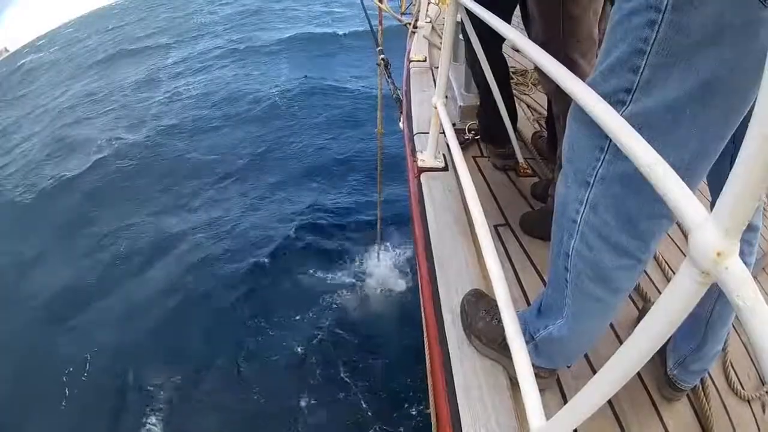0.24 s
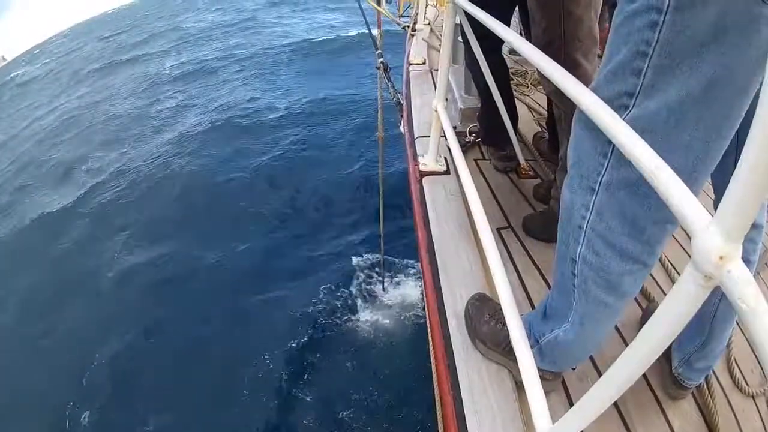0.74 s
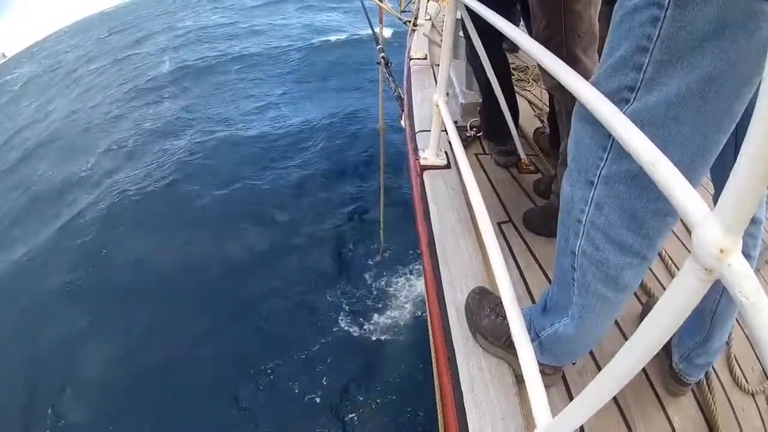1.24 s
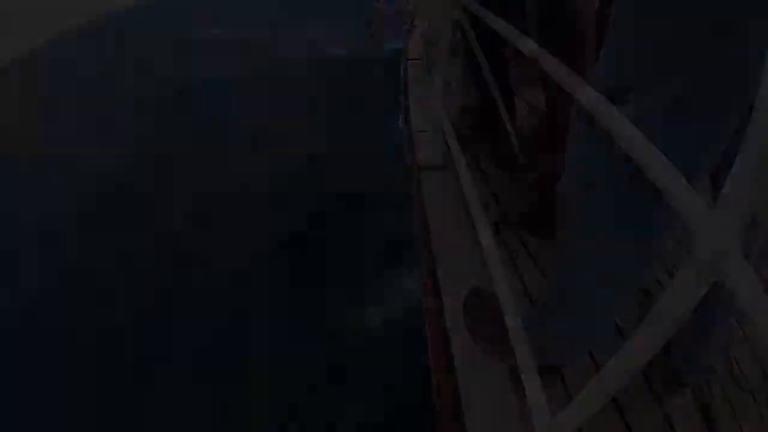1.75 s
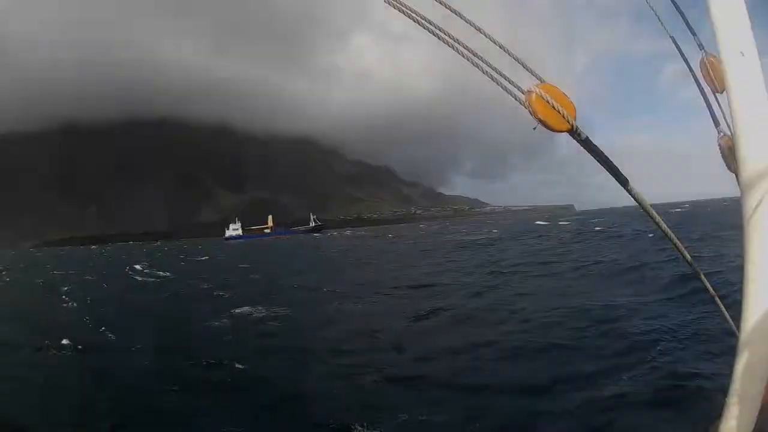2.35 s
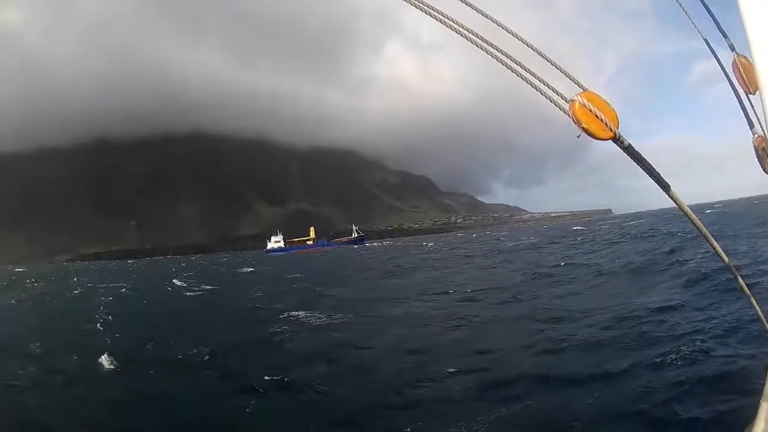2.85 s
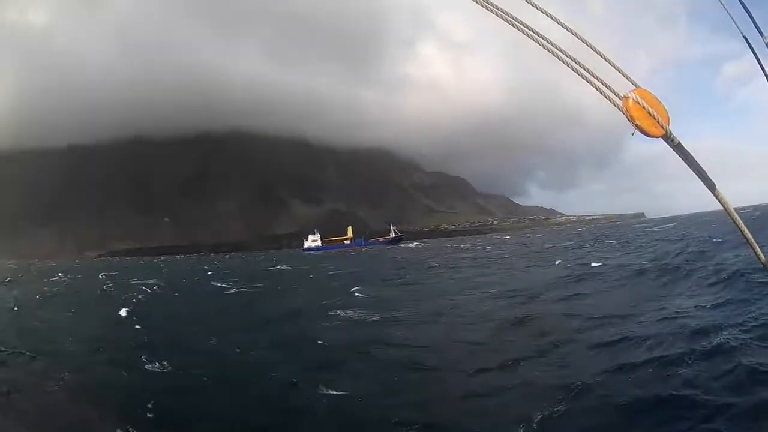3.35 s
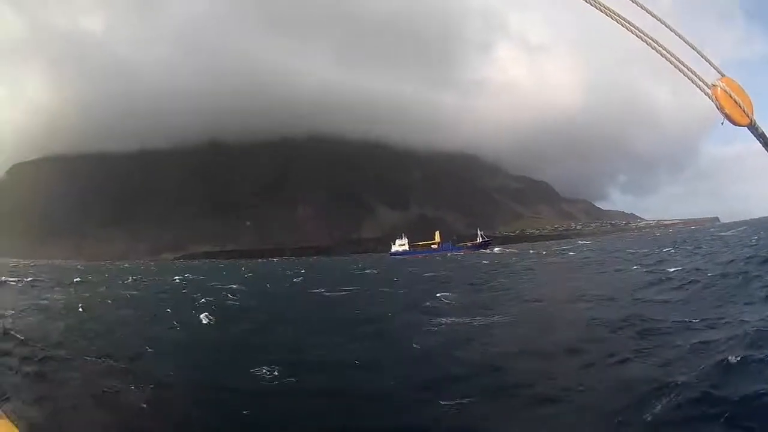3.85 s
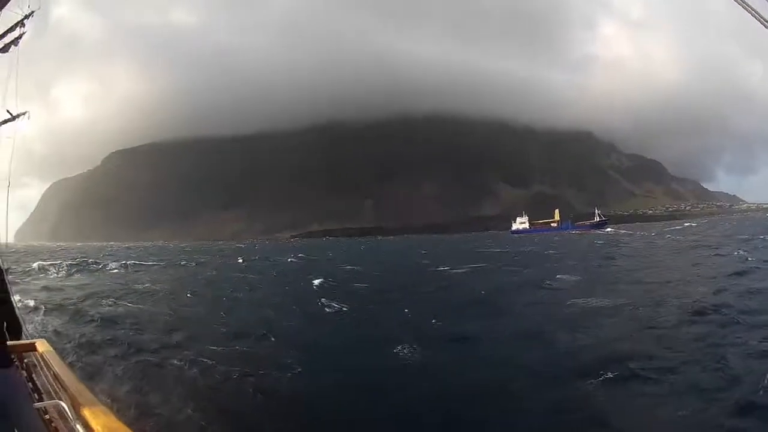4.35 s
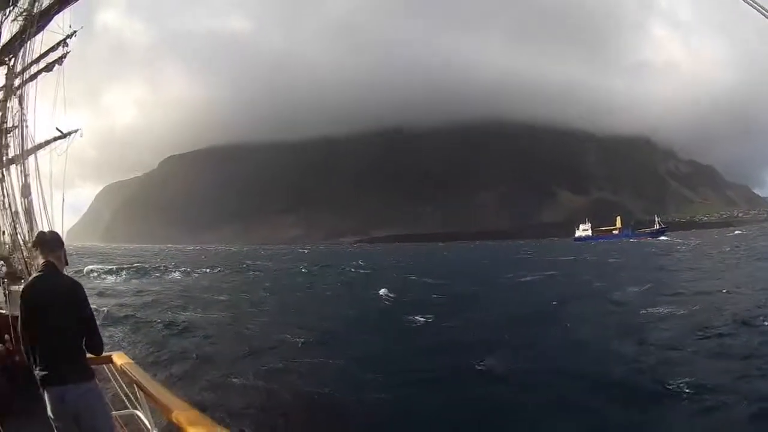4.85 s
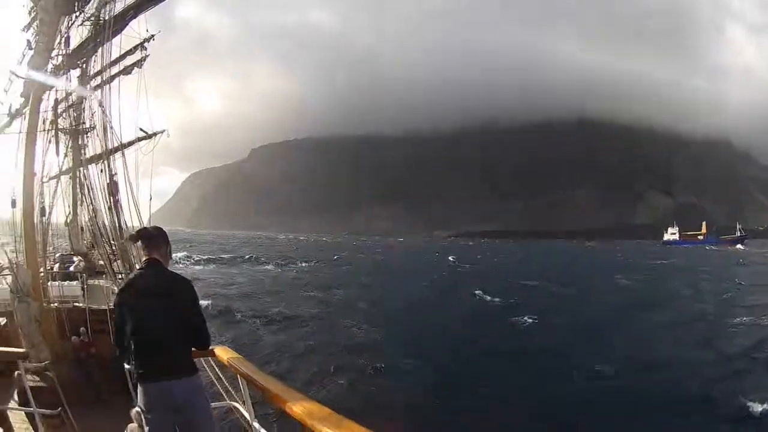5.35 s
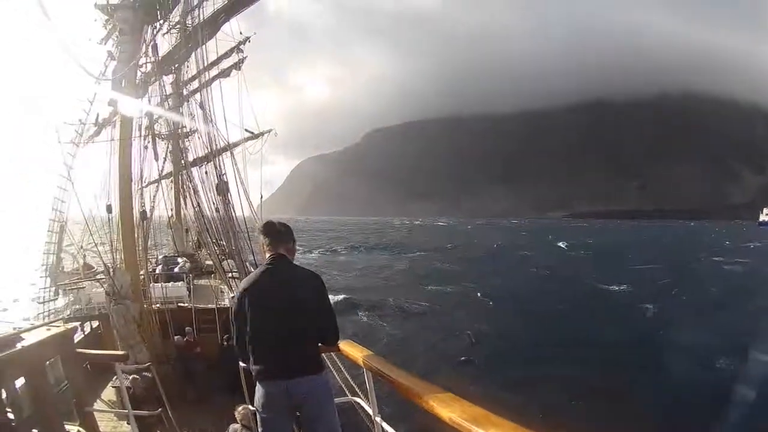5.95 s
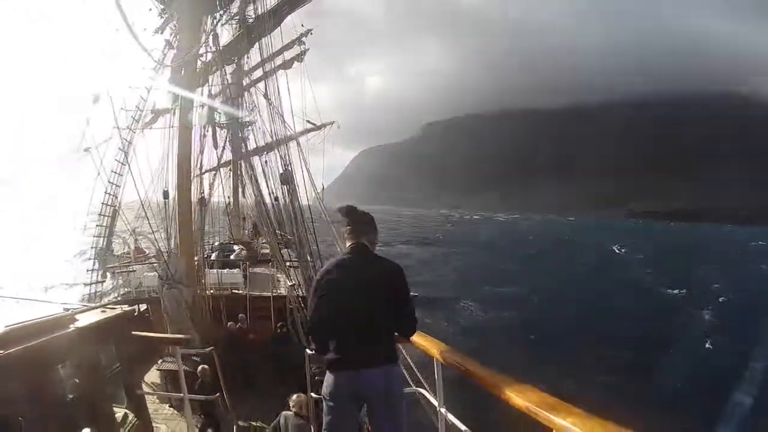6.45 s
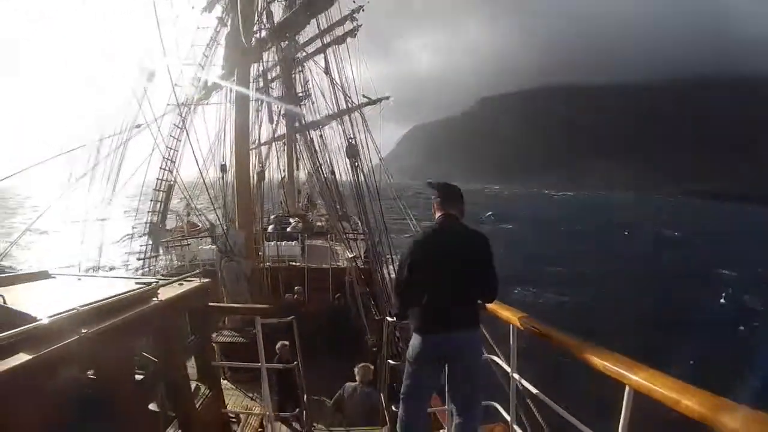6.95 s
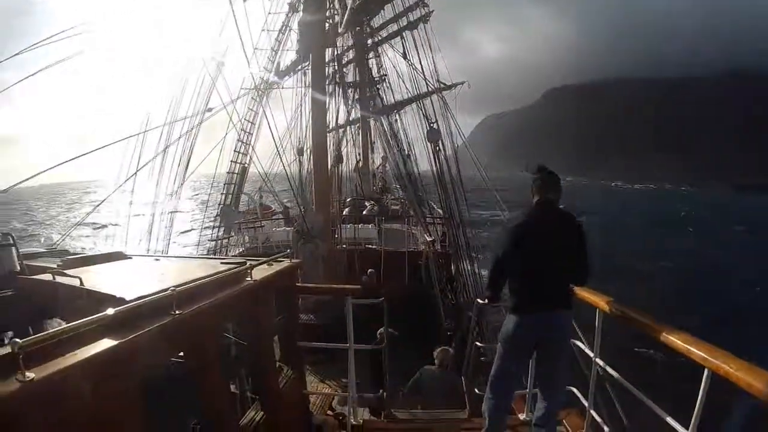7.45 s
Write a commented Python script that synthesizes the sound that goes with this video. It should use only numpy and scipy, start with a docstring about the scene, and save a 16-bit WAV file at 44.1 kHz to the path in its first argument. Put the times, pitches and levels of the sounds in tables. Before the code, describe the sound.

On a sailing ship at sea, dull water wash and brief squeaks fade into rough buffeting wind, with thumps, rushing bursts and a thin whine.

```python
"""Wind on the microphone port of a small camera in a closed housing, on a ship's deck.
The sound opens in the lee: sea wash, a faint machinery hum, a double tick and squeaks. It cross-fades to the
open deck, where gusts give a lumpy rumble (low coloured noise and single thumps), flutter and bursts of rushing
air (gated noise in the bands of the housing), with spray. Noise makes wash, spray and amplifier hiss; sines make
hum, squeaks and a thin electronic whine; damped sines ring the struck housing."""
import sys
import numpy as np
from scipy import signal
from scipy.fft import rfft, irfft, next_fast_len
from scipy.io import wavfile
from scipy.ndimage import uniform_filter1d, map_coordinates

SR = 44100
rng = np.random.default_rng(int(sys.argv[2]) if len(sys.argv) > 2 else 0)


def level_to_linear(level):
    """Convert decibel levels to linear amplitude factors, elementwise."""
    exponent = np.asarray(level, float) / 20
    return 10 ** exponent


def to_wav(sig):
    """Store sig (one row per channel, or 1-D mono) as 16-bit WAV at the path in sys.argv[1].

    Samples outside -1..1 are clipped; the rate is SR.
    """
    pcm = np.clip(np.atleast_2d(sig), -1, 1) * 32767
    pcm = np.round(pcm).astype(np.int16)
    wavfile.write(sys.argv[1], SR, pcm.T)  # frames by channels


N = 339393  # samples

REFERENCE_FLOW_DB, REFERENCE_PRESSURE_DB = -58, -38  # the reference wind


def unit(x):
    """Normalisation of the mean power: scale to rms 1."""
    return x / np.sqrt(np.mean(x ** 2) + 1e-20)


def curves(rows):
    """Linear interpolation in time: one value per sample for each column after the time."""
    s, *cols = np.transpose(rows)
    return [np.interp(np.arange(N) / SR, s, c) for c in cols]


def wobble(rate):
    """Band-limited random modulation: a smooth random curve with rate knots a second."""
    knots = rng.standard_normal(int(N * rate / SR) + 4)
    return map_coordinates(knots, [np.arange(N) * rate / SR])


def coloured(x, spectrum):
    """Linear filtering in the frequency domain: (Hz, dB) points joined on a log axis."""
    m = next_fast_len(N + 8192)
    f, db = np.transpose(spectrum)
    hz = np.fft.rfftfreq(m, 1 / SR)
    gain = level_to_linear(np.interp(np.log(hz + 1), np.log(f), db))
    return irfft(rfft(x, m) * gain, m)[:N]


def noise(spectrum, patchy_db):
    """Non-stationary coloured noise of rms 1: patches of random gain in time and frequency."""
    z = signal.stft(rng.standard_normal(N), nperseg=512)[2]
    field = uniform_filter1d(rng.standard_normal(z.shape), size=8, axis=0)
    field = uniform_filter1d(field, size=5, axis=1)
    patchy = signal.istft(z * level_to_linear(patchy_db * unit(field)), nperseg=512)[1][:N]
    return unit(coloured(patchy, spectrum))


def tones(lines, unsteady_db):
    """Line spectrum: sines of fixed frequency whose strengths waver a little."""
    t = np.arange(N) / SR
    total = np.zeros(N)
    for hz, db in lines:
        strength = np.sqrt(2) * level_to_linear(db + unsteady_db * wobble(3.24))
        total += strength * np.sin(2 * np.pi * (hz * t + rng.random()))
    return total


def swells(rows):
    """Power addition of bell-shaped envelopes (centre, level, length at half amplitude)."""
    t = np.arange(N) / SR
    power = sum(level_to_linear(db) ** 2 * np.exp(-np.log(2) * 2 * (2 * (t - s) / length) ** 2)
                for s, db, length in rows)
    return np.sqrt(power)


def share_open():
    """Linear cross-fade of exposure: 0 in the lee, 1 on the open deck."""
    # cross-fade from the lee to the open deck: start t/s, end t/s
    fade = (1.4, 2.53)
    return np.interp(np.arange(N) / SR, fade, [0, 1])


def lulls_db():
    """Momentary change of wind strength: bell-shaped dips in dB, one of them a slight rise."""
    # the wind drops out for a moment: centre t/s, depth level/dB, length at half depth t/s
    lulls = [(2.208, 4, 0.056), (2.388, 2, 0.056), (2.718, 5, 0.055), (3.1, 2.5, .04), (3.227, 3, 0.026),
             (4.268, 0, .03), (4.622, 5, 0.022), (4.97, 2.5, .04), (5.167, 2, 0.039), (6.033, 6, 0.026),
             (6.31, -1.5, 0.025), (6.708, 6, .05), (6.835, 3.5, 0.05), (6.94, 3, 0.025), (7.605, 3.5, 0.05)]
    t = np.arange(N) / SR
    return -sum(db * np.exp(-np.log(2) * (2 * (t - s) / length) ** 2) for s, db, length in lulls)


def wind_levels_db():
    """Wind as two coupled quantities, pressure and flow, that share the same lulls."""
    # the wind between its bursts, before the lulls:
    # t/s, pressure on the diaphragm level/dB, air flow through the port level/dB
    steady_wind = [(0, -43, -55), (.33, -40, -51), (.55, -42, -55), (.9, -41.5, -50.5),
                   (1.14, -41.5, -53.5), (1.74, -44.5, -55.5), (2.1, -35, -59.5), (2.45, -39.5, -65),
                   (2.75, -33.5, -63.5), (3.02, -31, -60), (3.47, -33.5, -60), (3.75, -36.5, -56.5),
                   (4.12, -38, -61), (4.45, -40.5, -63.5), (4.84, -32.5, -59), (5.3, -37, -56.5),
                   (5.68, -31, -52.5), (6.04, -33.5, -56.5), (6.47, -26.5, -52), (6.84, -31, -55.5),
                   (7.005, -33, -68), (7.035, -40.5, -68), (7.3, -50.5, -65), (7.52, -38, -62.5),
                   (7.7, -38.5, -69)]
    return curves(steady_wind) + lulls_db()


def camera():
    """Electronic self-noise: amplifier hiss and whine; unrelated hisses dip where they cross-fade."""
    # colour of the amplifier hiss: f/Hz, relative level/dB per Hz
    hiss_colour = [(2000, -0.5), (5000, 0), (9000, -3.5), (16000, -7)]
    # steady electronic tones at full exposure: f/Hz, level/dB rms
    whine = [(12952, -85), (13033, -85.5), (13113, -92.5)]
    hiss_db = -64.5  # rms
    deck = share_open()
    lee = level_to_linear(hiss_db) * noise(hiss_colour, patchy_db=-2.3)
    exposed = level_to_linear(hiss_db) * noise(hiss_colour, patchy_db=0.2) + tones(whine, unsteady_db=.5)
    return (1 - deck) * lee + deck * exposed


def machinery_hum():
    """Tonal radiation of machinery: a few lines that swell over a resting level, only in the lee."""
    # hum lines before the swell gain: f/Hz, level/dB
    hum_lines = [(271, -62), (566, -68.5), (591, -60.5)]
    # the hum swells: centre t/s, gain level/dB (added in power to the rest), length t/s
    hum_swell = [(.5, 2.5, 0.33), (1.7, 3, 0.88)]
    rest_db = -5
    gain = np.hypot(level_to_linear(rest_db), swells(hum_swell))
    return (1 - share_open()) * gain * tones(hum_lines, unsteady_db=2.1)


def sea():
    """Broadband turbulence of hull waves, dulled by the housing; wind-driven on deck, fuller in the lee."""
    # colour of the sea wash: f/Hz, relative level/dB per Hz
    wash_colour = [(450, -35), (600, -6.5), (780, -7.5), (1100, -7.5), (1400, -1.5), (1700, -9.5),
                   (2150, -17.5), (3000, -18), (3350, -20), (3900, -36.5)]
    # body of the near waves: f/Hz, relative level/dB per Hz
    gurgle = [(350, -41), (480, -6), (760, -4), (1000, -5.5), (1300, -36)]
    lee_db, deck_db = -55.5, -56.5  # on deck, at the reference wind
    follows = 0.38  # dB per dB of wind pressure on deck
    deck = share_open()
    over_db = wind_levels_db()[0] - REFERENCE_PRESSURE_DB
    level_db = (1 - deck) * lee_db + deck * (deck_db + follows * over_db)
    near = level_to_linear(-0.5) * (1 - deck) * noise(gurgle, patchy_db=3.0)
    return level_to_linear(level_db + 1.4 * wobble(11)) * (noise(wash_colour, patchy_db=2.0) + near)


def spray():
    """Superposition of many small impacts: showers of fine droplets heard as high-pitched hiss."""
    # showers of spray: centre t/s, level/dB rms at the crest, length t/s
    showers = [(5.68, -69, 0.24), (6.35, -86, .5)]
    # colour of the droplets: f/Hz, relative level/dB per Hz
    spray_colour = [(5000, -42), (7500, -2), (10000, -5), (12000, -30)]
    return swells(showers) * noise(spray_colour, patchy_db=5.0)


def squeak():
    """Linear frequency glide: thin tones whose phase is quadratic in time, so that they slide down."""
    # brief squeaks: centre t/s, level/dB rms at the crest, length t/s, f/Hz at the centre
    squeaks = [(0.483, -49, .11, 1394), (1.391, -48.5, 0.061, 1440)]
    sag = 1100  # Hz per second
    t = np.arange(N) / SR
    total = np.zeros(N)
    for s, db, length, hz in squeaks:
        cycles = (hz - sag * (t - s) / 2) * (t - s)
        total += np.sqrt(2) * swells([(s, db, length)]) * np.sin(2 * np.pi * cycles)
    return total


def ticks():
    """Impulse excitation of modes: a hard contact cracks for milliseconds and rings the housing."""
    # double tick on the housing: t/s, level/dB
    contacts = [(0.269, -29.5), (0.2803, -24.5)]
    # modes of the struck housing: f/Hz, level/dB relative to the tick, decay by 60 dB t/s
    shell = [(1440, -1, 0.0088), (2720, 3, 0.0049), (3180, -7, 0.0058), (4830, -4.5, 0.0041),
             (6000, -11, .005)]
    x, t = np.zeros(N), np.arange(SR // 50) / SR
    onset = 1 - np.exp(-t / 0.00028)
    for s, db in contacts:
        ring = sum(level_to_linear(level - 60 * t / t60) * np.sin(2 * np.pi * hz * t) for hz, level, t60 in shell)
        crack = level_to_linear(-11 - 60 * t / .004) * rng.standard_normal(len(t))
        x[round(s * SR):][:len(t)] -= level_to_linear(db) * onset * (ring + crack)
    return x


def thumps():
    """Damped swing of a diaphragm: each push sucks it out and lets it swing back once."""
    # single hard pushes of air on the diaphragm: t/s, peak level/dB, ring f/Hz
    pushes = [(2.335, -27, 80), (2.847, -23, 80), (2.927, -21, 80), (3.036, -23, 81), (3.168, -23, 80),
              (3.351, -24, 80), (3.521, -27, 80), (3.942, -23, 80), (4.232, -27.5, 79), (4.369, -20.5, 80),
              (5.035, -25, 80), (5.117, -21, 80), (5.604, -22, 80), (5.77, -18, 80), (5.841, -17.5, 80),
              (6.261, -17.5, 79), (6.402, -12, 81), (6.442, -18, 80), (6.498, -25, 80), (6.893, -19, 80),
              (7.415, -19, 80), (7.453, -17.5, 80), (7.64, -19.5, 79)]
    x, t = np.zeros(N + SR), np.arange(-SR // 40, SR // 40) / SR
    for s, db, hz in pushes:
        swing = np.cos(2 * np.pi * hz * t) * np.exp(-(3.0 * hz * t) ** 2)
        x[round(s * SR) - SR // 40:][:len(t)] -= level_to_linear(db) * swing
    return x[:N]


def puffs(width_s):
    """Turbulent bursts as an rms envelope: each puff swells and sinks evenly."""
    # short puffs of air through the port: t/s (6 ms ahead of the crest), nominal peak level/dB
    puff_rows = [(2.306, -43), (2.45, -43.5), (2.805, -40), (2.8708, -41.5), (2.9182, -40.5),
                 (2.9741, -38.5), (3.0275, -43), (3.0779, -41), (3.1667, -36.5), (3.221, -35),
                 (3.259, -37.5), (3.389, -38.5), (3.445, -41), (3.5179, -37), (3.7673, -49), (3.9095, -42),
                 (4.0542, -44), (4.225, -42), (4.295, -35.5), (4.425, -47), (4.6343, -41), (4.791, -38),
                 (4.8314, -44), (4.889, -40.5), (5.013, -55), (5.028, -38.5), (5.0684, -46), (5.092, -44),
                 (5.2021, -44), (5.671, -37), (5.7059, -36.5), (5.8715, -46), (6.0237, -40), (6.0691, -42),
                 (6.1539, -39), (6.339, -33), (6.371, -35), (6.4083, -40), (6.435, -33.5), (6.4782, -39),
                 (6.5075, -35.5), (6.6034, -33.5), (6.653, -37), (6.751, -33), (6.8663, -46), (6.9615, -38),
                 (7.4031, -44), (7.448, -35.5), (7.5013, -46), (7.5422, -46), (7.635, -39)]
    env, u = np.zeros(N + SR), np.arange(-SR // 20, SR // 20) / SR / width_s
    for s, db in puff_rows:
        start = round((s + .006) * SR) - SR // 20
        env[start:][:len(u)] += level_to_linear(db - 8.0) / np.cosh(u)  # noise peaks well over its rms
    return env[:N]


def surges():
    """Intermittent flow: envelopes that rise, hold, then cut off."""
    # surges of flow: start t/s, length to the end of the hold t/s, level/dB of the flow
    surge_rows = [(3.24, 0.038, -53.5), (3.407, 0.24, -55), (4.186, 0.07, -60), (4.292, 0.083, -58.5),
                  (4.677, .1, -56.5), (5.22, 0.079, -56.5), (5.54, 0.214, -52), (5.754, .05, -49.5),
                  (6.137, 0.15, -49), (6.32, 0.078, -55), (6.58, .1, -51.5), (6.75, 0.058, -55),
                  (6.957, 0.048, -57), (7.387, 0.075, -52), (7.63, .03, -56)]
    attack_s, release_s = 0.029, 0.0096
    t = np.arange(N) / SR
    return sum(level_to_linear(db) * np.interp(t - s, [0, attack_s, length, length + release_s], [0, 1, 1, 0])
               for s, length, db in surge_rows)


def rumble(heave, facing, eddies):
    """Turbulent pressure on a diaphragm: low noise, gathered on deck near the diaphragm's own swing."""
    # rumble away from the diaphragm's own swing: f/Hz, relative level/dB per Hz
    loose_colour = [(15, -21), (25, 0.5), (45, -2), (110, -7), (170, -11.5), (230, -30), (300, -90)]
    # rumble near the diaphragm's own swing: f/Hz, relative level/dB per Hz
    tight_colour = [(15, -20), (30, -1), (45, 0), (100, -2), (135, -1.5), (175, -14.5), (230, -23),
                    (300, -82)]
    tight_lee, tight_deck, facing_tightens = .05, .85, 0.087  # share of the power, 0-1
    deck = share_open()
    tight = np.clip(tight_lee + deck * (tight_deck + facing_tightens * facing - tight_lee), 0, 1)
    loose_body = np.sqrt(1 - tight) * noise(loose_colour, patchy_db=1.2)
    tight_body = np.sqrt(tight) * noise(tight_colour, patchy_db=-0.98)
    lumps = level_to_linear((0.44 + 0.54 * deck) * wobble(22) + 0.29 * eddies)
    return heave * unit(lumps * (loose_body + tight_body))


def flutter(heave, rush_db, facing, eddies, bursts):
    """Flow-induced vibration: the diaphragm shakes with flow, pressure and each puff, more head-on."""
    # colour of the flutter: f/Hz, relative level/dB per Hz
    flutter_colour = [(100, -51), (170, -1.5), (300, -3), (450, -9), (600, -16.5), (900, -50.5)]
    base_db, per_flow_db, per_pressure_db = -51, 0.71, 0.16  # at the reference wind; dB per dB
    facing_shakes_db = 6.5  # from side-on to head-on, on deck
    deck = share_open()
    over_db = 20 * np.log10(heave) - REFERENCE_PRESSURE_DB
    level_db = base_db + per_flow_db * deck * (rush_db - REFERENCE_FLOW_DB) + per_pressure_db * over_db
    shaking = level_to_linear(deck * 1.2 * eddies + 0.51 * wobble(45))
    shake = unit(shaking * noise(flutter_colour, patchy_db=-1.2))
    turned = level_to_linear(facing_shakes_db * deck * (facing - .5))
    return np.hypot(level_to_linear(level_db), 0.98 * bursts) * turned * shake


def rush(rush_db, facing, eddies, bursts):
    """Jet noise shaped by resonance: eddies gate the air at the port and the housing colours it."""
    # the housing's colour on the rush: f/Hz, relative level/dB per Hz
    housing = [(400, -9.5), (600, -9), (780, -5.5), (1100, -11), (1400, -0.5), (1700, -10.5), (2150, -15.5),
               (2650, -8.5), (3100, -14), (3350, -8), (3800, -20), (4400, -32), (5000, -90)]
    # upper band of the rush in the lee: f/Hz, relative level/dB per Hz
    top_lee = [(3300, -60), (4000, -2.5), (5300, -3.5), (6000, 1.5), (6450, -0.5), (6900, -16), (8000, -60)]
    # upper band of the rush on the open deck: f/Hz, relative level/dB per Hz
    top_open = [(3300, -55), (4000, 0), (5300, -1.5), (6000, 0.5), (6450, -4), (6900, -24), (8000, -60)]
    # narrow hiss of air skimming across the port: f/Hz, relative level/dB per Hz
    port = [(2900, -42), (3200, -4), (3400, 2), (3600, -6), (3900, -30)]
    port_db = -11  # against the rush, when side-on
    bright_lee_db, bright_deck_db, facing_dulls_db = -15, -14, 5.5  # upper band over the rush
    full_db = 4.5  # the full rush is louder than its 2-4 kHz part
    deck = share_open()
    gate = unit(level_to_linear((0.5 + 0.46 * deck) * eddies + 1.1 * wobble(110)))
    air = np.hypot(level_to_linear(rush_db + full_db) * gate, bursts)
    # the upper band follows the puffs, but the gusts only loosely
    loose_db = uniform_filter1d(rush_db, size=SR // 8)
    thin_air = np.hypot(level_to_linear(loose_db + full_db) * gate, bursts)
    low = noise(housing, patchy_db=0.4)
    skim = level_to_linear(port_db) * deck * np.clip(1 - facing, 0, 1) * noise(port, patchy_db=3.0)
    top = np.sqrt(1 - deck) * noise(top_lee, patchy_db=1.5)
    top = top + np.sqrt(deck) * noise(top_open, patchy_db=1.6)
    bright_db = (1 - deck) * bright_lee_db + deck * (bright_deck_db - facing_dulls_db * facing)
    flicker_db = 2.0 * deck * wobble(17)  # the upper band flickers on its own
    return air * (low + skim) + thin_air * level_to_linear(bright_db + flicker_db) * top


def wind():
    """Common turbulent excitation: the same eddies drive rumble, flutter and rush, more so on deck."""
    # large eddies that heave the rumble up: centre t/s, level/dB rms at the crest, length t/s
    buffets = [(.92, -39, 0.067), (2.33, -29, 0.09), (2.67, -34.5, 0.057), (2.95, -34, 0.07),
               (3.05, -24.5, 0.04), (3.19, -36, .06), (3.34, -30.5, 0.094), (3.52, -28, 0.028),
               (3.94, -34, 0.093), (4.24, -38, 0.028), (4.35, -29.5, .1), (4.49, -31.5, 0.063),
               (4.63, -31.5, 0.094), (4.75, -31, 0.19), (5.06, -28, 0.036), (5.12, -29.5, 0.018),
               (5.51, -35, 0.032), (5.62, -33, 0.058), (5.85, -30.5, .08), (6.01, -30.5, 0.035),
               (6.26, -26.5, 0.066), (6.42, -24, 0.073), (6.67, -27, 0.033), (6.79, -29, 0.078),
               (6.9, -28, 0.035), (6.975, -29.5, 0.045), (7.12, -33, 0.02), (7.37, -35.5, 0.076),
               (7.48, -30, 0.093), (7.65, -32, 0.036)]
    # how squarely the turning camera faces the wind: t/s, share 0-1
    facing_rows = [(1.8, 0.05), (2.4, 0.9), (3.1, 0.55), (3.8, 0.7), (4.3, 0.23), (4.9, 0), (5.4, 0.02),
                   (5.8, 0.02), (6.3, 0.56), (6.9, 0.77), (7.7, 0.7)]
    pressure_db, flow_db = wind_levels_db()
    heave = np.hypot(level_to_linear(pressure_db), swells(buffets))
    rush_db = 20 * np.log10(np.hypot(level_to_linear(flow_db), surges()))
    facing, = curves(facing_rows)
    eddies = wobble(32)
    bursts = puffs(width_s=0.0048)
    low = rumble(heave, facing, eddies) + thumps()
    middle = flutter(heave, rush_db, facing, eddies, bursts)
    return low + middle + rush(rush_db, facing, eddies, bursts)


def scene():
    """Linear superposition at one microphone: all sources add as sound pressures."""
    background = camera() + machinery_hum() + sea() + spray()
    return (background + squeak() + ticks() + wind())[None]


def top_cut(x):
    """Nothing passes above the cut-off."""
    return signal.sosfilt(signal.butter(12, 15700, fs=SR, output="sos"), x)


def record(dry):
    """End of the signal chain: the finished mix passes through the last stage unchanged in level."""
    return top_cut(dry)


dry = scene()
out = record(dry)
to_wav(out)
```